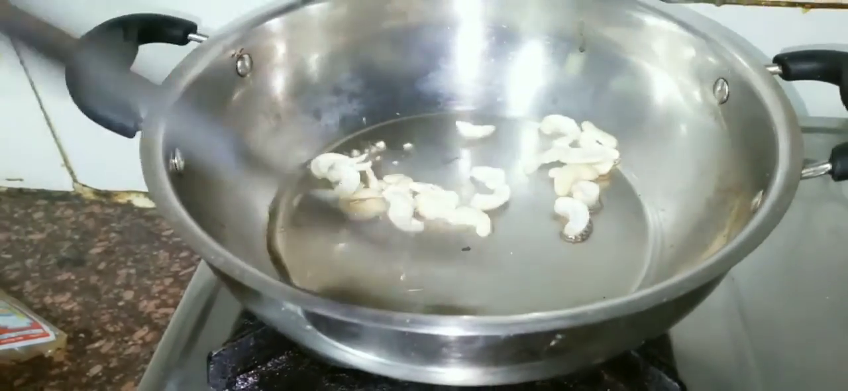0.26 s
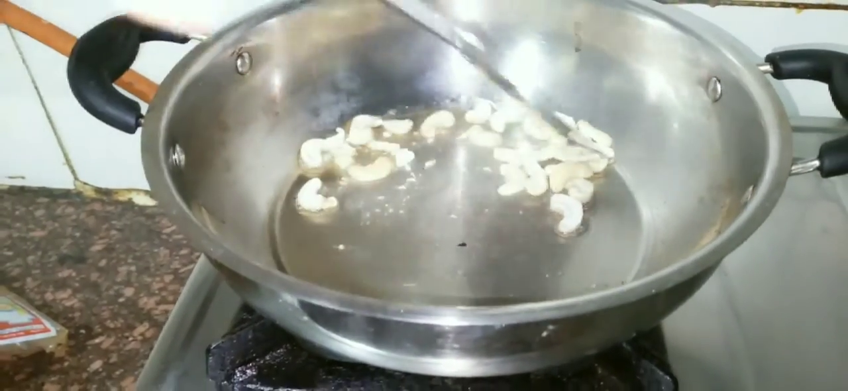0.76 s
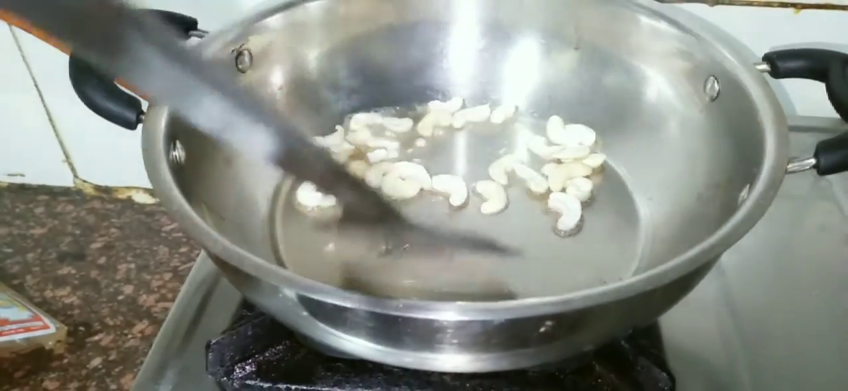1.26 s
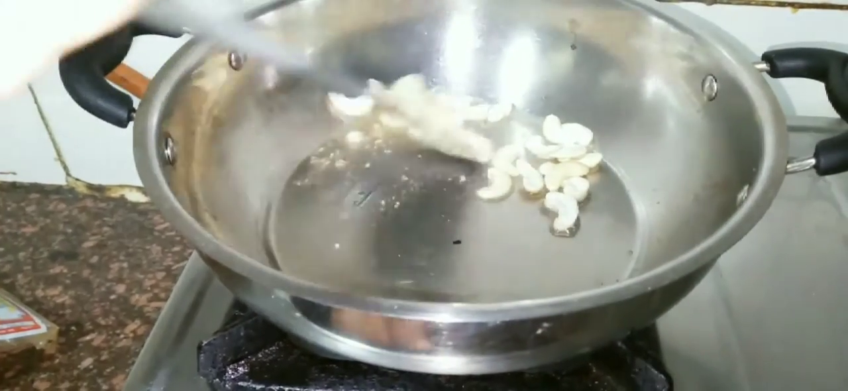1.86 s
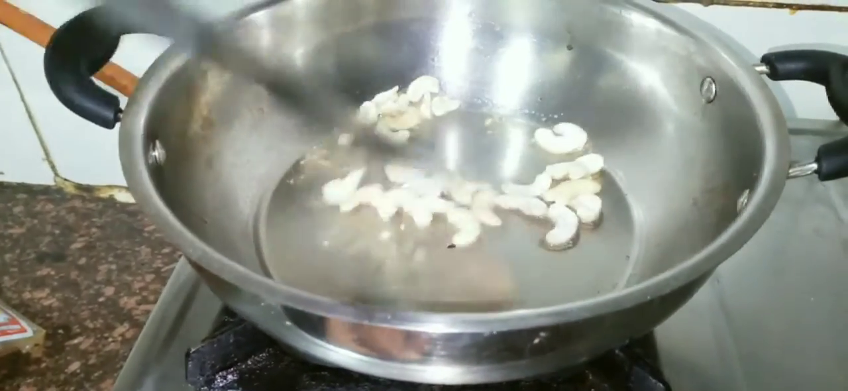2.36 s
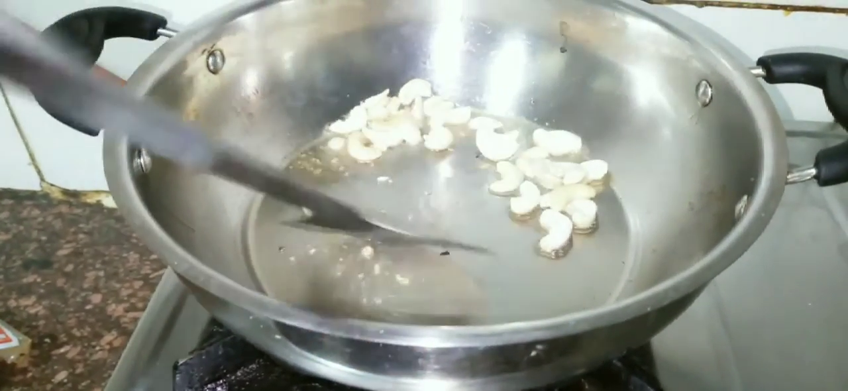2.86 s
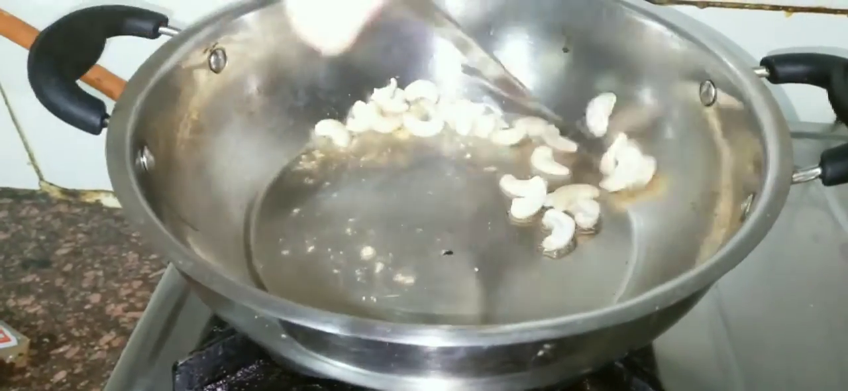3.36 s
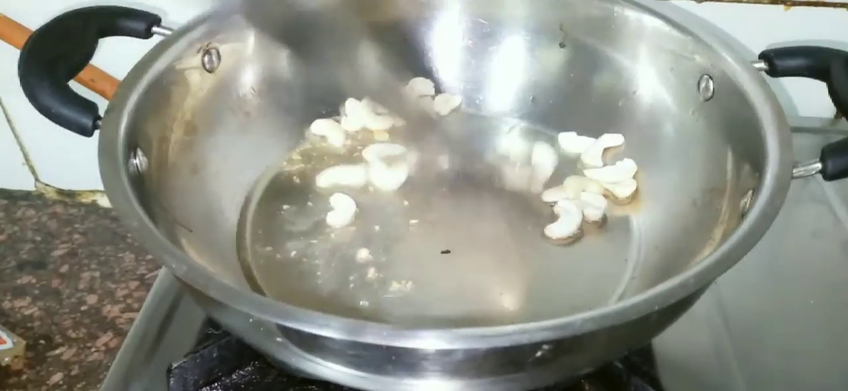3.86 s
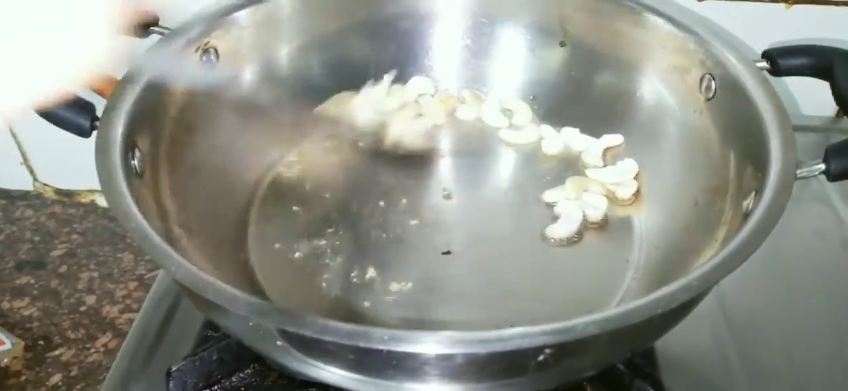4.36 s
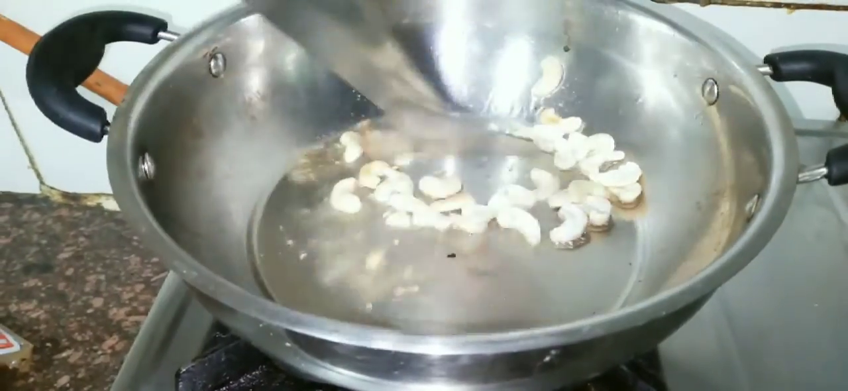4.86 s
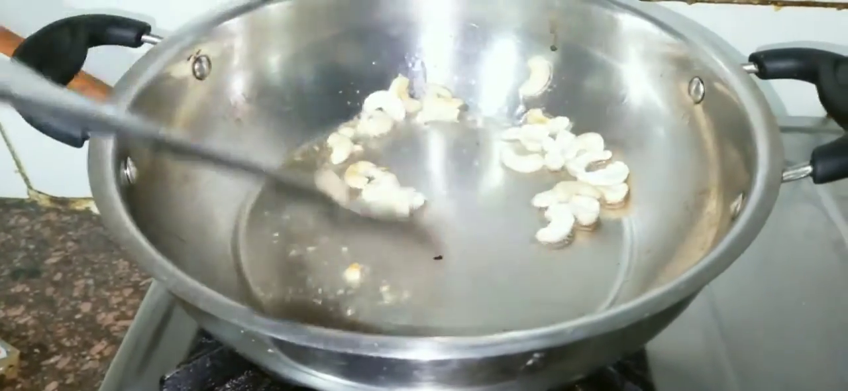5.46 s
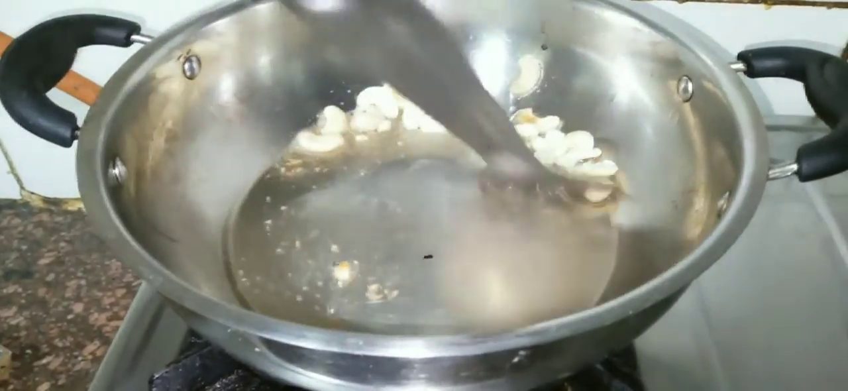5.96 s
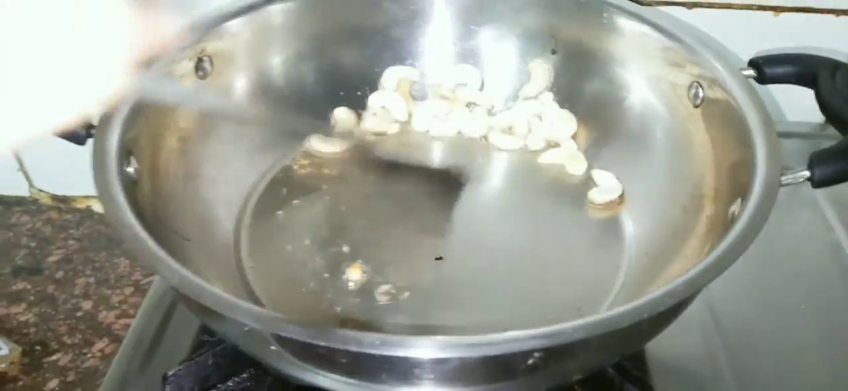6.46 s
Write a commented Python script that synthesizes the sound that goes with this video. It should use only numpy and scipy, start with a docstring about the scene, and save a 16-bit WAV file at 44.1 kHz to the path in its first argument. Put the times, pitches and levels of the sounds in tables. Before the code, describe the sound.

Nuts fry in a steel pan, heard close up in a small kitchen. Bright, crackling sizzle and fine ticking spray come first, with sharp oil spits throughout. A steel spatula repeatedly clanks and scrapes, making the pan ring, while nuts rub and clack. The frying gradually sinks; near five seconds the sound drops out twice for an instant, then stirring continues.

```python
"""Cashews fry in a little oil in a steel pan, close to a phone microphone in a small kitchen.
From the start steam bubbles burst as filtered impulses over hiss, and a fine spray ticks, soon dying down;
a steel spatula excites the pan's modes as it knocks and slides, and the oil spits in decaying volleys.
Shoved nuts rub by stick and slip and most shoves make the frying flare; from 2 s squeals and ringing tones join.
The frying sinks as the nuts dry; near 5 s the sound cuts out twice for a moment, then stirring goes on."""
import sys
import numpy as np
from scipy import signal
from scipy.fft import rfft, irfft
from scipy.io import wavfile

SR = 44100
rng = np.random.default_rng(int(sys.argv[2]) if len(sys.argv) > 2 else 0)


def waveform_to_disk(signal):
    """Save audio, clipped to [-1, 1], as 16-bit WAV at the path in sys.argv[1]."""
    frames = np.transpose(np.atleast_2d(signal))
    scaled = np.clip(frames, -1, 1) * 32767
    samples = np.round(scaled).astype(np.int16)
    wavfile.write(sys.argv[1], SR, samples)


N = 295161
TIME = np.arange(N) / SR  # s

# spectrum of steam bursting through hot oil: f/Hz, relative density/dB
SIZZLE_SPECTRUM = [(100, -80), (300, -80), (600, -39.5), (1000, -27), (2000, -24), (3000, -20.5),
                   (4500, -14.5), (6000, -8.5), (7300, 0), (8300, 0.5), (9500, -4.5), (11000, -12.5),
                   (12500, -21), (16000, -9.5)]
# spatula landings: t/s, blow level before a common offset/dB, hardness as a tilt/(dB per octave),
# ringing of the pan/dB, drive of the slide that follows/dB, slide length/s
LANDINGS = [(0.031, -20.5, 4.5, 4, -38, 0.13), (0.366, -17.5, 3, 1.5, -38, 0.16),
            (1.235, -11.5, 1.5, -3, -34.5, 0.19), (1.665, -15.5, 5, 4.5, -33, 0.13),
            (2.501, -12.5, 4, 3, -32.5, 0.16), (2.894, -12, 2.5, -0.5, -33, 0.18),
            (3.372, -21.5, 5, 9.5, -39, 0.25), (3.772, -10, 1, -3.5, -38, 0.2),
            (3.859, -21.5, 4, 1, -25, 0.05), (4.184, -10, 2, -3, -33.5, 0.16),
            (4.776, -17, 6, 0.5, -32, 0.061), (5.012, -10.5, 3, -2, -30.5, 0.17),
            (5.441, -10.5, 1.5, -8, -31, 0.15), (5.900, -11.5, 3.5, 1.5, -35, 0.25),
            (6.009, -23.5, -0.5, -2, -30, 0.026), (6.316, -12, 2, -0.5, -35, 0.19)]
# shoves of the nuts through the oil: middle t/s, length/s, rubbing level/dB, change of the sizzle/dB
SHOVES = [(0.034, 0.2, -31.5, 4), (0.302, 0.1, -39, -0.5), (0.933, 0.24, -26, 1), (1.68, 0.22, -36, 2),
          (1.971, 0.15, -32, 2.5), (2.284, 0.34, -27.5, 5), (3.057, .14, -33, -1.5),
          (3.275, 0.17, -32.5, 3), (3.534, 0.12, -31.5, -3), (3.859, 0.14, -38, -3.5),
          (4.046, 0.11, -36, 1), (4.546, 0.32, -32.5, 2.5), (4.81, .16, -35.5, 4.5),
          (6.454, 0.38, -32.5, 5.5)]


def amp(db):
    """Level to amplitude ratio: 20 dB is a factor of ten."""
    return 10 ** (np.asarray(db) / 20)


def unit(x):
    """Normalisation to an rms of 1."""
    return x / np.sqrt(np.mean(x ** 2) + 1e-20)


def fade(t, t60):
    """Exponential decay: the amplitude falls by 60 dB in t60 seconds."""
    return np.exp(-np.log(1000) * t / max(t60, 1e-3))


def add(mix, s, sound):
    """Superposition: adds a sound to the mix from s seconds on."""
    part = mix[max(round(s * SR), 0):][:len(sound)]
    part += sound[:len(part)]


def colour(x, spectrum, size=2048):
    """Minimum-phase filter with the given spectrum: being causal, it keeps the sharp front of clicks."""
    hz, db = np.transpose(spectrum)
    grid_hz = abs(np.fft.fftfreq(size, 1 / SR)) + 1
    log_gain = np.log(amp(np.interp(np.log(grid_hz), np.log(hz), db)))
    # the Hilbert transform of the log gain gives the phase
    taps = np.fft.ifft(np.exp(np.conj(signal.hilbert(log_gain)))).real
    return signal.fftconvolve(x, taps[:size // 2])[:len(x)]


def band(x, hz, octaves):
    """Band-pass filter: a bell around hz on an octave scale."""
    away = np.log2((np.fft.rfftfreq(len(x), 1 / SR) + 1) / hz) / octaves
    return unit(irfft(rfft(x) / (1 + (away ** 2 / 2) ** 2), len(x)))


def wander(per_s):
    """Low-passed noise of rms 1, which changes about per_s times a second."""
    lowpass = 1 / (1 + (np.fft.rfftfreq(N, 1 / SR) / per_s) ** 2)
    return unit(irfft(rfft(rng.standard_normal(N)) * lowpass, N))


def clicks(per_s, spread_db, size=N):
    """Random impulse train: either sign, with levels spread exponentially on the dB scale."""
    chance = rng.random(size)
    strength = rng.exponential(1, size)
    sign = rng.choice([-1, 1], size)
    return (chance < per_s / SR) * sign * amp(spread_db * np.minimum(strength, 4))


def echoes(x, t60, wet_db, size=16384, count=5):
    """Diffuse reverberation: dense dying reflections, whose paths keep changing as things move."""
    t = np.arange(size) / SR
    tails = rng.standard_normal((count, size)) * fade(t, t60) * (t > .0008)
    path = (np.arange(N) // 300) % count  # a new path every 300 samples
    wet = np.zeros(N)
    for k, tail in enumerate(tails):
        wet += signal.oaconvolve(x * (path == k), tail / np.linalg.norm(tail))[:N]
    return x + amp(wet_db) * wet


def bubbles(per_s, spread_db, low_hz, high_hz, cycles, rise, count=16):
    """Damped cavity resonance: each bubble pings with rising pitch, smaller bubbles higher."""
    t = np.arange(400) / SR
    out = np.zeros(N)
    for hz in np.geomspace(low_hz, high_hz, count):
        age = t * hz / cycles
        pitch_hz = hz * (1 + rise * np.tanh(age / 2))
        ping = np.sin(2 * np.pi * np.cumsum(pitch_hz) / SR) * np.exp(-age)
        train = np.convolve(clicks(per_s / count, spread_db), ping)[:N]
        out += np.sqrt(hz) * unit(train)
    return unit(out)


def thuds(rows, size=16384):
    """Dense modal ringing: short blows as decaying band noise; rows of t/s, level/dB, f/Hz, octaves, t60/s."""
    out = np.zeros(N)
    t = np.arange(size) / SR
    for s, db, hz, octaves, t60 in rows:
        onset = 1 - np.exp(-t / 0.000077)
        blow = band(rng.standard_normal(size), hz, octaves) * fade(t, t60) * onset
        early = blow[t < max(t60, .01) / 8]
        add(out, s, amp(db) * blow / early.std())
    return out


def swell(middle, length):
    """Gaussian pulse: a shove gathers speed and slows, from 0 to 1, length wide at half height."""
    return 2 ** -((2 * (TIME - middle) / length) ** 2)


def flare_db():
    """Steam release: shoves turn moist sides of the nuts into the oil, raising or, at times, lowering the level."""
    return sum(db * swell(middle, length) for middle, length, _, db in SHOVES)


def low_rush():
    """Stationary random noise: a faint, mostly low rush."""
    # spectrum of the rush: f/Hz, relative density/dB
    rush_spectrum = [(20, -22), (60, -4), (110, 11), (150, -7), (270, -23), (1000, -18), (4000, -4.5),
                     (16000, -20.5)]
    return amp(-68) * unit(colour(rng.standard_normal(N), rush_spectrum))


def clunks():
    """Impact excitation: the pan rocks on its support; a harder knock favours the higher bands."""
    # shifts of the pan: t/s, level/dB, hardness as a tilt/(dB per octave)
    shifts = [(1.242, -51, -6), (3.373, -27, -0.5), (6.637, -27.5, 13.5)]
    # crowded bands of the pan on its support: centre f/Hz, relative level/dB, width/octaves, t60/s
    support_bands = [(344, -8.5, 0.39, 0.3), (870, -4, 0.46, 0.32), (1400, -2.5, 0.33, 0.14),
                     (2100, -2, 0.72, 0.1)]
    rows = []
    for s, level_db, tilt_db in shifts:
        for hz, db, octaves, t60 in support_bands:
            rows.append((s, level_db + db + tilt_db * np.log2(hz / 1000), hz, octaves, t60))
    return thuds(rows)


def clacks(count=3):
    """Collision of small solids: nuts ring on each other and the steel, a few lighter ones around each shove."""
    # loudest clacks: t/s, level/dB, centre f/Hz, t60/s
    loud_clacks = [(.925, -20.5, 5170, .25), (0.948, -30.5, 2410, 0.12), (2.202, -28.5, 3050, 0.35),
                   (2.232, -27, 2800, 0.17), (2.279, -31.5, 2090, 0.053), (3.254, -24, 4700, .066),
                   (3.524, -28, 3000, 0.11), (4.379, -27, 4500, 0.027), (6.283, -30, 3650, 0.044)]
    octaves = 0.32  # width of the band that a nut rings in
    low_hz, high_hz = 1750, 4600  # pitch range of the lighter clacks
    rows = [(s, db, hz, octaves, t60) for s, db, hz, t60 in loud_clacks]
    for middle, length, db, _ in SHOVES:
        for when, pitch, softness in rng.random((count, 3)):
            hz = low_hz * (high_hz / low_hz) ** pitch
            level_db = db - 1.5 - 6 * softness  # relative to the rubbing
            rows.append((middle + (when - .5) * length, level_db, hz, octaves, 0.053))
    return thuds(rows, size=8192)


def squeals_and_ringing():
    """Narrow-band resonance: the sliding edge squeals with gliding pitch, or the blade or pan rings on."""
    # tones: start t/s, end t/s, level/dB, first f/Hz, last f/Hz, rms pitch wander/octaves;
    # the faint, nearly steady one near 970 Hz is the blade ringing, the last, near 1.6 kHz, a mode of the pan
    tone_rows = [(1.914, 1.95, -36, 2550, 2010, 0.19), (2.693, 2.742, -48.5, 300, 270, 0.17),
                 (5.011, 5.463, -54, 972, 985, 0.037), (5.467, 5.598, -46.5, 1480, 1236, 0.03),
                 (5.915, 6.07, -44.5, 770, 793, 0.059), (6.306, 6.482, -36.5, 1557, 1690, 0.0046)]
    out = np.zeros(N)
    for start, end, db, first_hz, last_hz, octaves in tone_rows:
        size = max(round((end - start) * SR), 64)
        hz = np.linspace(first_hz, last_hz, size) * 2 ** (octaves * wander(116)[:size])
        level_db = 2.5 * wander(50)[:size] + np.linspace(0, -6, size)  # unsteady, easing off
        tone = np.sin(2 * np.pi * np.cumsum(hz) / SR) * amp(level_db)
        add(out, start, amp(db) * unit(tone) * signal.windows.tukey(size, .4))
    return out


def rubbing_db():
    """Addition of powers: sinking light contact, weaker before each landing, plus a swell for each shove."""
    lift_s = .16  # the spatula is in the air before it lands
    lifted = np.max([swell(row[0] - lift_s / 2, lift_s) for row in LANDINGS], axis=0)
    contact_db = -33.5 - 1.4 * TIME - 4 * lifted
    shove_power = sum((amp(db) * swell(middle, length)) ** 2 for middle, length, db, _ in SHOVES)
    return 10 * np.log10(amp(contact_db) ** 2 + shove_power)


def rubbing():
    """Stick-slip friction: nuts catch and slip on the steel, and churn up larger bubbles that chirp."""
    # spectrum of nuts rubbing on steel: f/Hz, relative density/dB
    rub_spectrum = [(100, -96), (280, -17), (500, -12.5), (800, -8), (1300, -7), (2000, -5), (2700, 1),
                    (4000, -2), (6000, 2.5), (9000, -2), (14000, -52)]
    slips = unit(clicks(1400, spread_db=4.0) * amp(10.3 * np.tanh(wander(12.3))))
    chirps = bubbles(per_s=220, spread_db=3.2, low_hz=2000, high_hz=6000, cycles=4.5, rise=.3)
    churn = echoes(slips + amp(-5) * chirps, t60=.05, wet_db=-3, size=4096)
    return unit(colour(churn, rub_spectrum)) * amp(rubbing_db())


def ring(force, tilt_db):
    """Modal superposition: the force drives the pan's modes, reweighted and detuned at random for each call."""
    # modes of the pan and spatula: f/Hz before detuning, mean level/dB, t60/s
    pan_modes = [(288, -28, .4), (349, -28, .4), (425, -31, .3), (780, -19, .3), (962, -24, .3),
                 (1300, -18, .2), (1415, -20, .25), (1594, -8, .18), (1626, -11.5, .17), (1688, -12, .18),
                 (2470, -17, .2), (2600, -14, .14), (2670, -13, .15), (2830, -16, .14), (3045, -10, .15),
                 (3088, -11, .17), (3480, -17, .14), (4044, -9, .2), (4360, -15, .18), (4730, -10, .11),
                 (4880, -12, .11), (5192, -6, .18), (5320, -10, .11), (5620, -9, .11), (6020, -8, .11),
                 (6930, -5, .1), (7330, -4, .1), (7516, 1, .12), (7745, -4, .1), (8320, -5, .1)]
    t = np.arange(len(force)) / SR
    spread = [[6], [.007], [np.pi]]  # dB, fraction of the frequency, radians
    weights_db, detunings, phases = rng.uniform(-1, 1, (3, len(pan_modes))) * spread
    response = np.zeros(len(force))
    for (hz, db, t60), weight_db, detune, phase in zip(pan_modes, weights_db, detunings, phases):
        level_db = db + weight_db + tilt_db * np.log2(hz / 3000)
        response += amp(level_db) * np.sin(2 * np.pi * hz * (1 + detune) * t + phase) * fade(t, t60)
    return signal.fftconvolve(force, response)[:len(force)]


def spatula(size=20000, count=660):
    """Impact, then friction: steel clashes and rings, and the sliding edge keeps driving the modes."""
    # spectrum of steel on steel: f/Hz, relative density/dB
    clash_spectrum = [(40, -22.5), (150, -24), (300, -19), (550, -17.5), (1000, -19), (2200, -15.5),
                      (3000, -11), (4200, -11.5), (6000, -6), (8300, -3.5), (9700, -5.5), (10500, -7),
                      (12000, -15), (16000, -13)]
    # spectrum of the dragged edge: f/Hz, relative density/dB
    drag_spectrum = [(60, -44), (180, -7.5), (290, 0), (520, -4.5), (780, -4), (1400, 0.5), (2100, 0),
                     (3000, -3.5), (6000, 11.5), (12000, -35)]
    out = np.zeros(N)
    t = np.arange(size) / SR
    for s, blow_db, tilt_db, ring_db, slide_db, slide_s in LANDINGS:
        tone = ring(signal.unit_impulse(size), tilt_db)
        chatter = rng.standard_normal(size) * fade(t, 0.024)
        # each blow also wakes a random crowd of short-lived modes
        crowd = np.zeros(size)
        for hz in rng.uniform(900, 15500, size=110):
            crowd += np.sin(2 * np.pi * hz * t) * rng.standard_normal()
        crowd *= fade(t, .085)
        clash = chatter / chatter[:count].std() + amp(-2.5) * crowd / crowd[:count].std()
        clash = colour(clash, clash_spectrum)
        blow = amp(ring_db - 3.5) * tone / tone[:count].std() + amp(0.5) * clash / clash[:count].std()
        cushion = 1 - np.exp(-t / .0015)  # the oil film softens the landing
        add(out, s, amp(blow_db + 2.0) * blow * cushion)

        # the edge starts to brush the steel just before it lands
        graze = unit(colour(rng.standard_normal(count), clash_spectrum)) * np.hanning(count)
        add(out, s - .006, amp(blow_db - 13) * graze)

        edge = clicks(1500, spread_db=4, size=size)
        singing = unit(colour(ring(edge, tilt_db), [(300, 4.5), (1600, -4.5), (3000, -20.0), (7500, -5)]))
        slide = amp(ring_db) * singing + amp(-3.0) * unit(colour(edge, drag_spectrum))
        add(out, s, amp(slide_db) * slide / (1 + (t / slide_s) ** 6))
    return out


def spray():
    """Random impulse noise: the smallest droplets tick at the very top, most while the nuts are still wet."""
    # spectrum of the droplets: f/Hz, relative density/dB
    fizz_spectrum = [(3000, -33), (8000, 13), (11000, 5), (13000, 20), (16000, -31)]
    ticks = clicks(per_s=2500, spread_db=3.5)
    wetness = 1 / (1 + (TIME / 1.33) ** 6)  # halved at 1.33 s
    level_db = -44 + 16.5 * wetness + 0.42 * flare_db()
    return unit(colour(ticks * amp(3.3 * wander(25)), fizz_spectrum)) * amp(level_db)


def sizzle_db():
    """Falling steam production: the level sinks as the nuts dry, varies with shoves and briefly dips or lifts."""
    # brief changes of the sizzle: middle t/s, length/s, change/dB
    brief_changes = [(1.487, 0.16, -0.5), (3.74, 0.36, 2), (5.386, 0.17, -7)]
    changes_db = sum(db * swell(middle, length) for middle, length, db in brief_changes)
    return -19.5 - 1.43 * TIME + flare_db() + changes_db


def lesser_spits(count=44):
    """Random events, one per equal time slot, as strong as the frying is lively: t/s, level/dB, t60/s."""
    place, strength, length = rng.random((count, 3)).T
    s = (np.arange(count) + place) / count * N / SR
    level_db = np.interp(s, TIME, sizzle_db()) + 4.5 * (1 - 2 * strength)
    return list(zip(s, level_db, .11 * (.5 + length)))


def spits(size=4096, count=220):
    """Flash boiling: a water drop turns to steam with one snap, then a dying volley of smaller ones."""
    # hard spits: t/s, level/dB, t60 of the burst/s, low thump/dB
    hard_spits = [(0.1188, -12, 0.15, -24), (0.18, -13.5, 0.041, -23), (0.3193, -14, 0.4, -42),
                  (0.492, -16, 0.2, -20.5), (0.607, -13, .08, -42), (0.7949, -16.5, 0.45, -54),
                  (0.962, -9.5, 0.095, -45), (0.9752, -13, .05, -41), (1.084, -10, 0.11, -50),
                  (1.099, -18.5, 0.21, -14), (1.6283, -7.5, .06, -37), (1.788, -12.5, 0.044, -50),
                  (2.297, -15, 0.022, -31), (2.475, -14, 0.035, -50), (2.5619, -10, 0.04, -14.5),
                  (3.04, -14, 0.047, -50), (3.1055, -16, 0.21, -54), (3.911, -7, 0.057, -17),
                  (4.564, -10.5, 0.053, -25), (4.6572, -9, 0.083, -24.5), (4.8439, -9, 0.041, -22.5),
                  (5.215, -21, 0.085, -46), (5.32, -19, 0.032, -43), (5.4163, -21.5, 0.023, -55),
                  (5.6318, -20, 0.094, -55), (5.723, -15.5, 0.027, -55), (6.124, -17.5, 0.023, -50),
                  (6.188, -13, 0.065, -54)]
    out = np.zeros(N)
    t = np.arange(size) / SR
    for s, db, t60 in lesser_spits() + [row[:3] for row in hard_spits]:
        hz = 8360 * 2 ** (0.21 * rng.standard_normal())  # scatter in octaves
        volley = clicks(1500, spread_db=2.5, size=size) + .4 * rng.standard_normal(size)
        volley += 1.2 * signal.unit_impulse(size)
        tilt_db = 12 * np.log2(hz / 8000)  # per octave: larger drops sound lower
        spectrum = [(f, d + tilt_db * np.clip(np.log2(f / 8000), -1.2, 1)) for f, d in SIZZLE_SPECTRUM]
        burst = colour(volley * fade(t, t60), spectrum)
        add(out, s, amp(db) * burst / burst[:count].std())
    u = t / 0.00031
    thump = (1 - u / 2) * np.exp(-u)  # a low thump as the hardest spits overload the microphone
    for s, _, _, thump_db in hard_spits:
        add(out, s + 0.00284, amp(thump_db) * thump)
    return out


def sizzle():
    """Bubble acoustics: steam bursts in clumps over a fine hiss, and the pan reflects each one."""
    pings = bubbles(per_s=1100, spread_db=3.0, low_hz=3000, high_hz=13500, cycles=2.4, rise=.1)
    snaps = unit(clicks(per_s=750, spread_db=-4.5))
    clumps_db = 4.5 * np.tanh(wander(50))
    crackle = unit((pings + amp(-5) * snaps) * amp(clumps_db))
    hiss = amp(-14) * rng.standard_normal(N)
    frying = echoes(crackle + hiss, t60=.055, wet_db=-2, size=4096, count=12)
    return unit(colour(frying, SIZZLE_SPECTRUM)) * amp(sizzle_db())


def scene():
    """Superposition in a small room: the pan's sounds reverberate over a faint rush, the same in both ears."""
    stirring = clunks() + clacks() + squeals_and_ringing() + rubbing() + spatula()
    frying = spray() + spits() + sizzle()
    kitchen = echoes(frying + stirring, t60=.3, wet_db=-20, count=3)
    sound = kitchen + low_rush()
    return np.array([sound, sound])


def record(dry):
    """Saturation: peaks are rounded off a little unevenly; then come two cut-outs and a band limit."""
    # silent moments: start t/s, end t/s
    gaps = [(4.695, 4.748), (5.143, 5.1985)]
    fine = signal.resample_poly(dry, 2, 1, axis=1)  # twice the rate, against aliasing
    fine = fine / (1 + (fine / .8) ** 4) ** (1 / 4)
    sound = signal.resample_poly(fine + 0.0098 * fine ** 2, 1, 2, axis=1)
    for start, end in gaps:
        sound = sound * ((TIME < start) | (TIME > end))
    lowpass = signal.firwin(511, 15950, window=("kaiser", 8), fs=SR)  # cut-off in Hz
    return signal.oaconvolve(sound, lowpass[None], "same")


dry = scene()
out = record(dry)
waveform_to_disk(out)
```